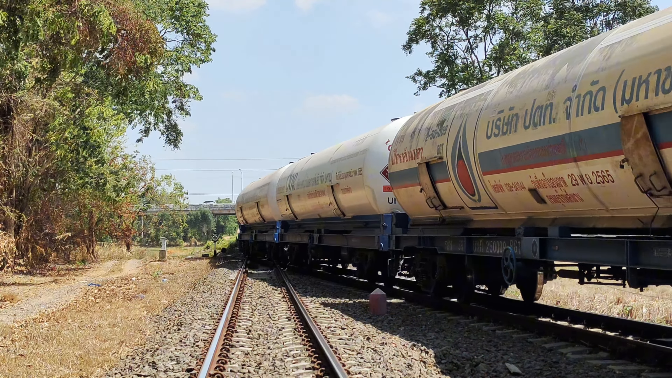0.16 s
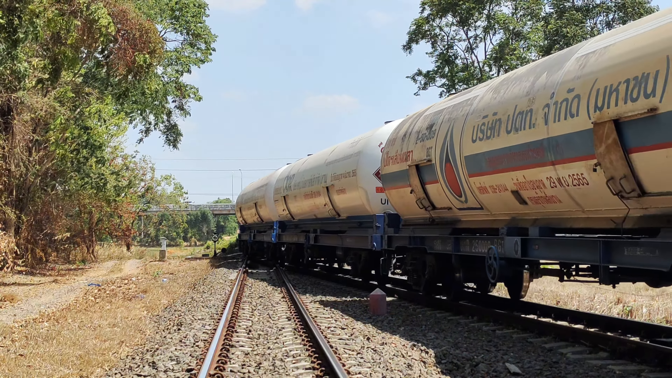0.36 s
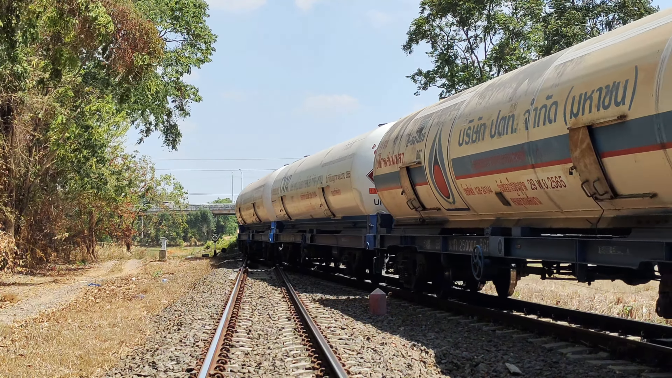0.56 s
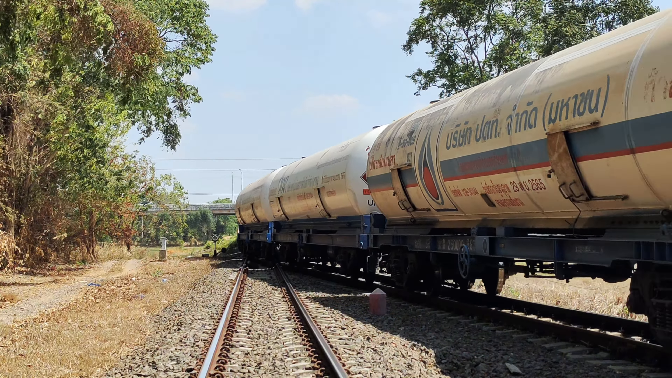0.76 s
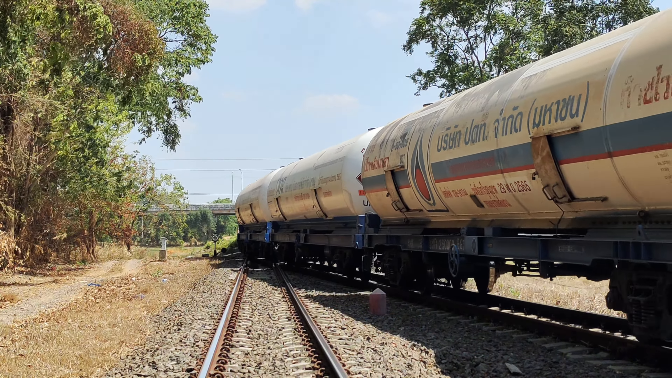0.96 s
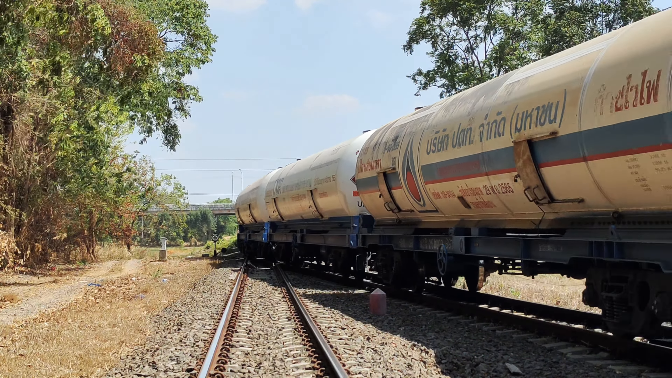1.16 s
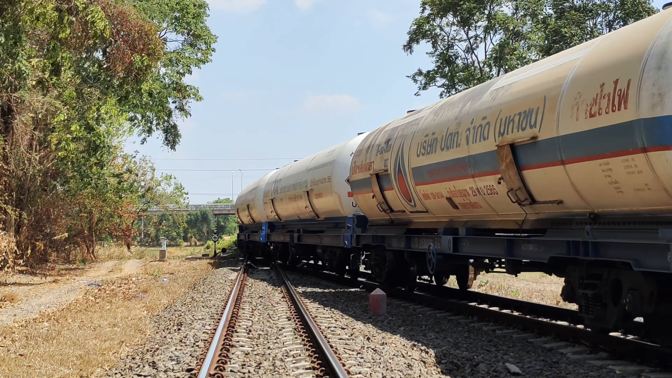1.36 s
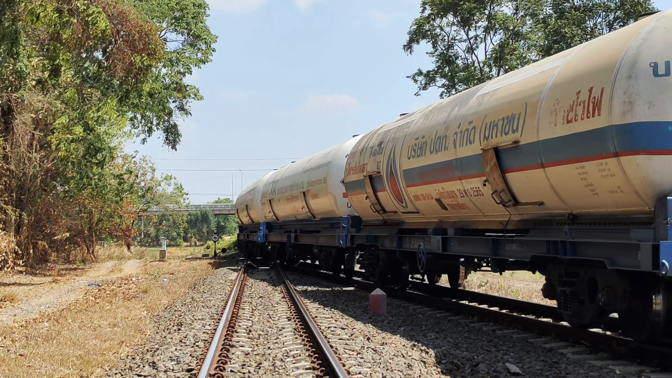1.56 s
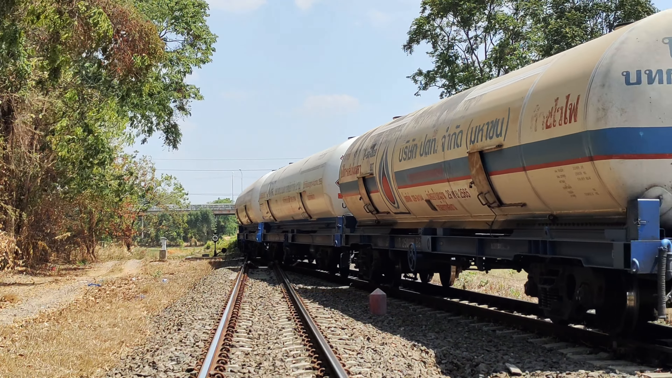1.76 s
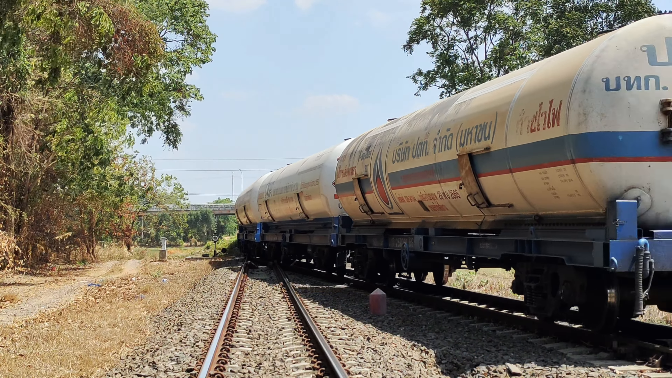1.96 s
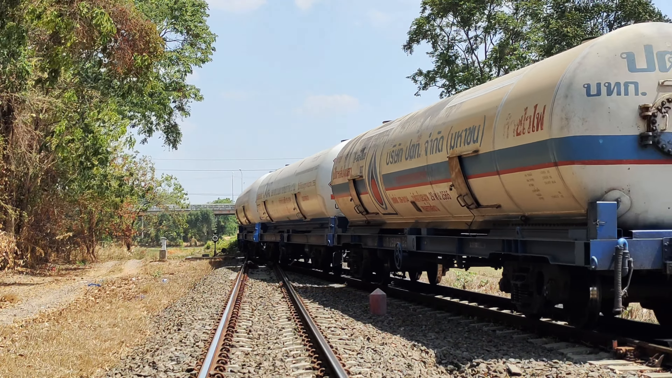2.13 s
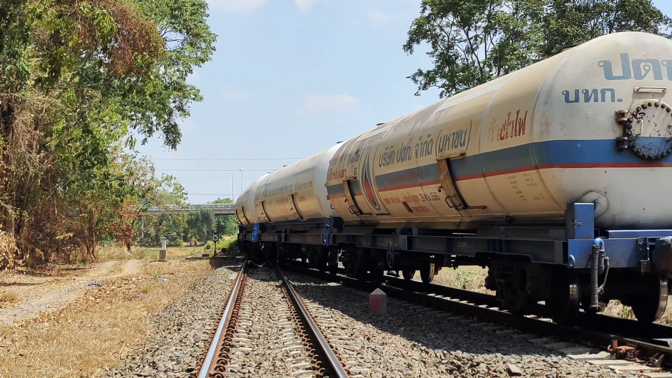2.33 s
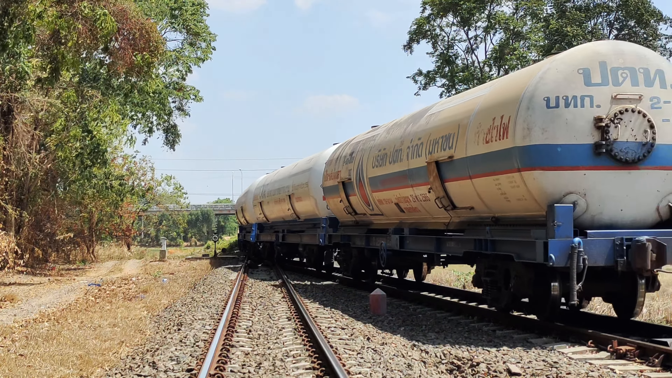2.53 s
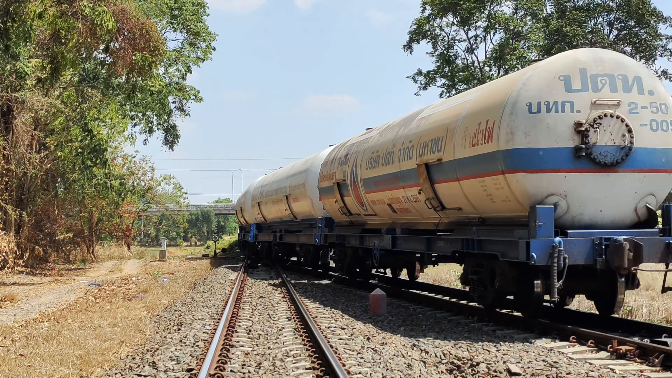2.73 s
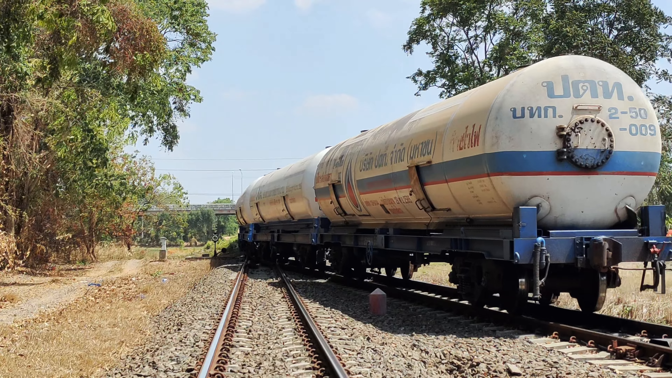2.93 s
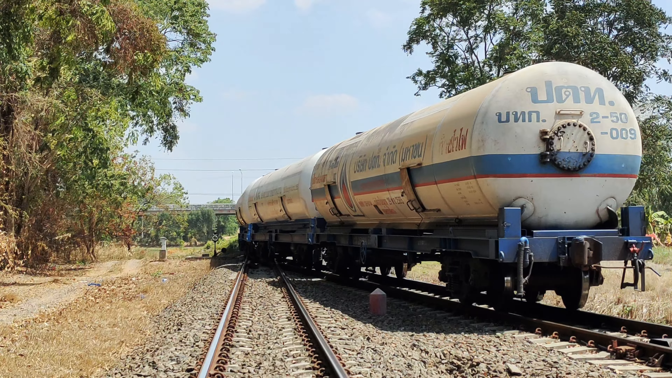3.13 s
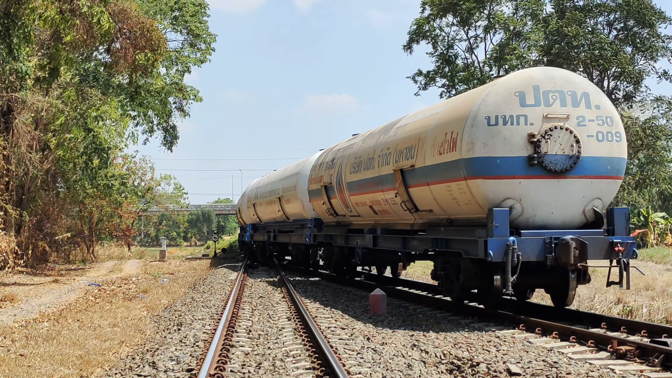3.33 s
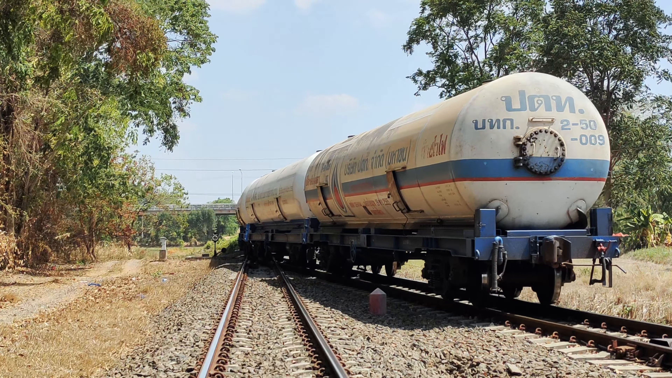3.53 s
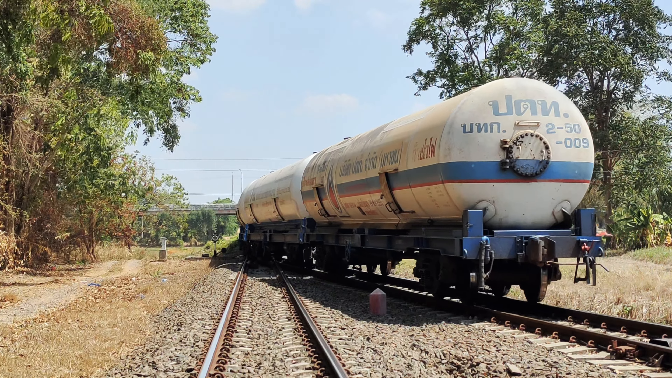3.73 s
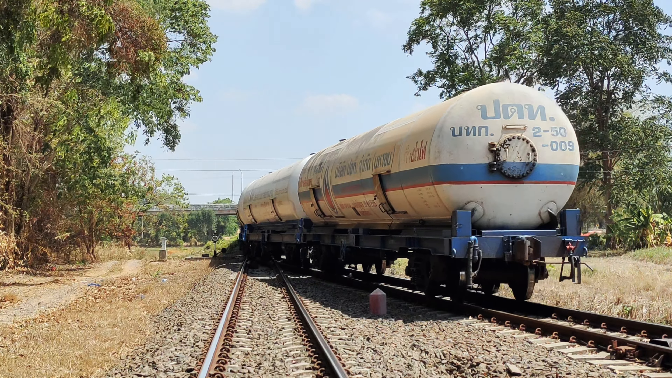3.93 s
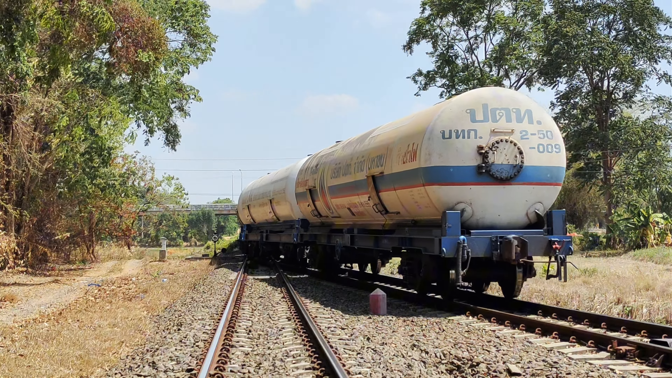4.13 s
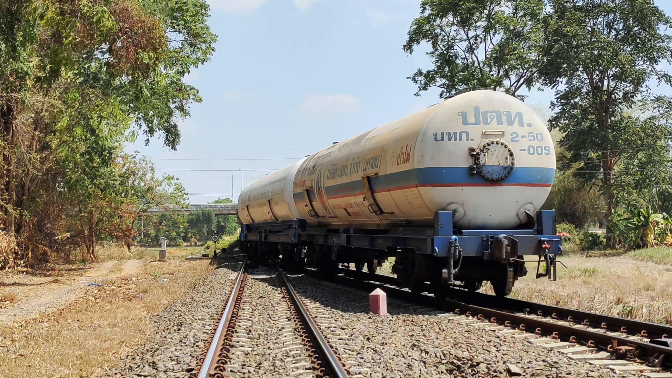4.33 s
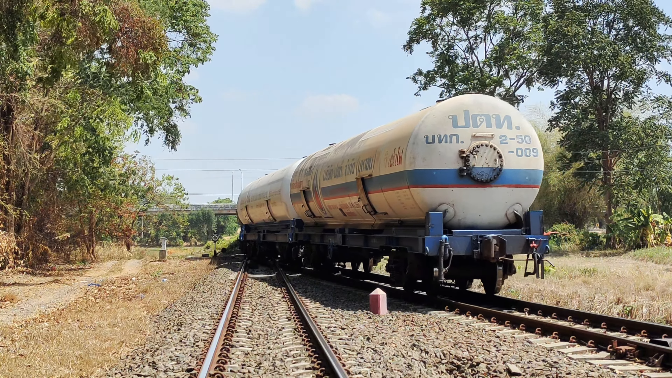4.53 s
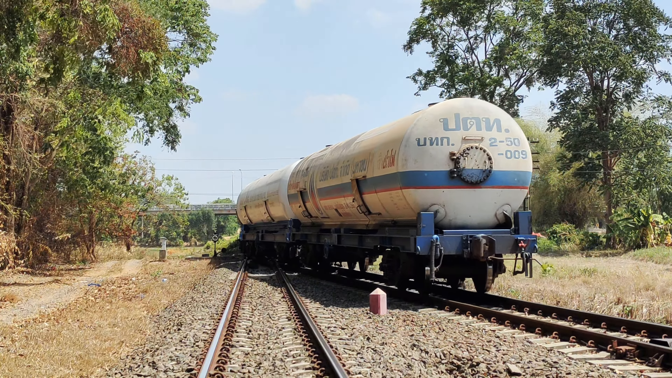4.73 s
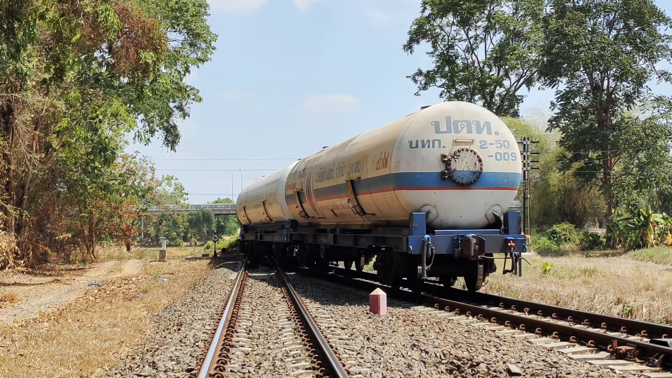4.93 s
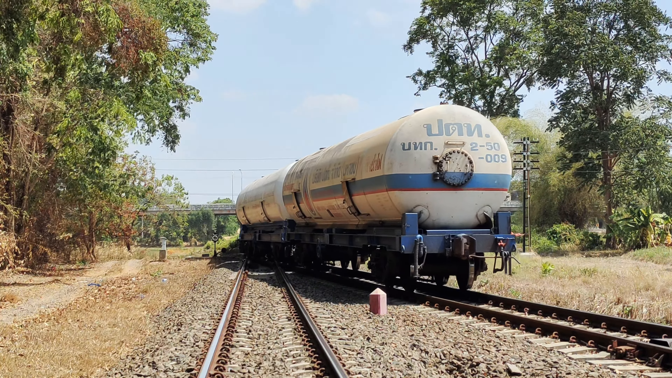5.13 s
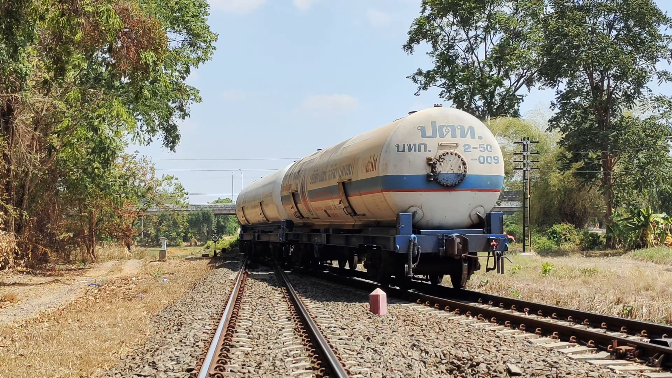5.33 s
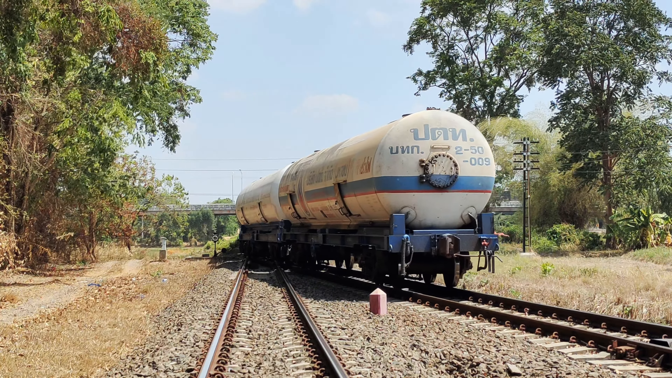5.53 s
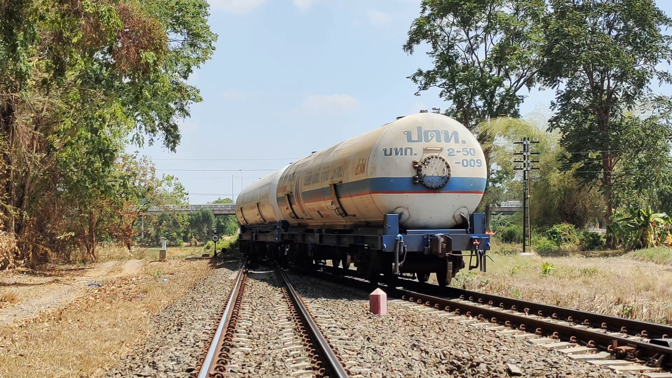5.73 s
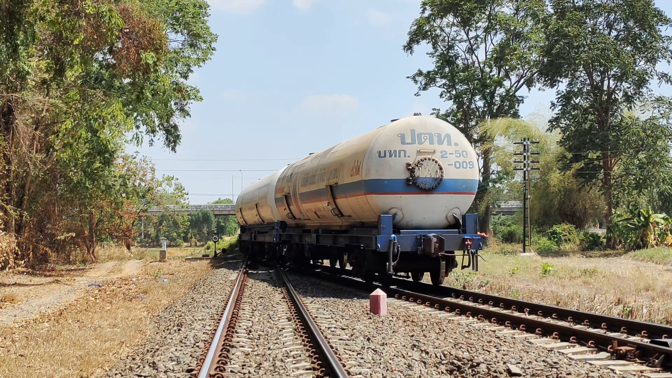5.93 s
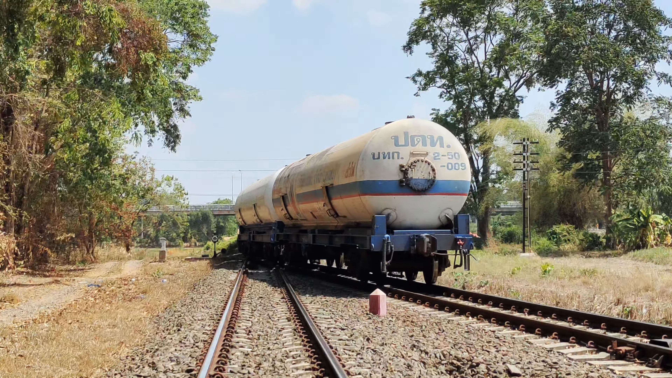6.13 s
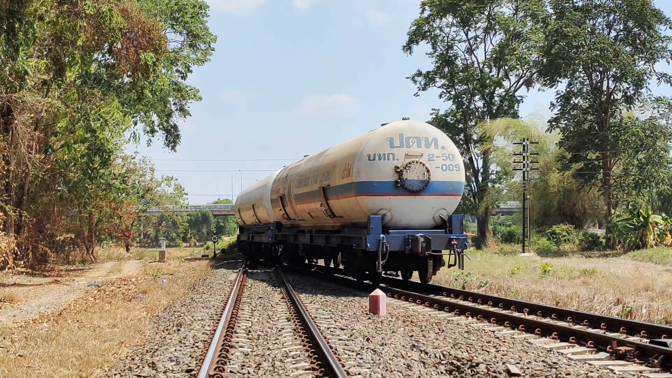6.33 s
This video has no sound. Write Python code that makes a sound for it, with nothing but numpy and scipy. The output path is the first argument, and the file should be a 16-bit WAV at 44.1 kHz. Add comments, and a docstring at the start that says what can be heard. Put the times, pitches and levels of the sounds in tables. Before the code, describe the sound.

Steel train wheels squeal piercingly on a curve over low rumble and grinding, with a clatter of knocks early on, then gradually thin out.

```python
"""A train of tank wagons rolls slowly away round a tight curve in an open yard lined with trees.
From the start two slipping wheels squeal near 3.2 and 3.4 kHz (wavering tones with overtones and echoes),
flanges grind and wagons rumble and boom (shaped noise), and other wheel tones sing out briefly.
Between 1.3 and 2.1 s the last bogie groans (rough tones) and knocks over a rail joint (bursts of noise).
From 1.4 s, and mostly near the end, puffs of air bump the microphone (short falling tones)."""
import sys
import numpy as np
from scipy import signal
from scipy.fft import rfft, irfft, next_fast_len
from scipy.io import wavfile
from scipy.ndimage import uniform_filter1d

SR = 44100
rng = np.random.default_rng(int(sys.argv[2]) if len(sys.argv) > 2 else 0)


def digitize_waveform(pressure):
    """Quantize a signal to 16-bit integers and store it at the path in sys.argv[1].

    Rows of a 2-D input are taken as channels; values are limited to [-1, 1].
    """
    field = np.atleast_2d(pressure).T
    bounded = np.clip(field, -1, 1)
    quanta = np.round(bounded * 32767).astype(np.int16)
    wavfile.write(sys.argv[1], SR, quanta)


N = 285768
T = np.arange(N) / SR   # time of every sample in seconds

# Spectrum tables give relative levels: the noise made from them is scaled to rms 1.
# A resonance's width is how far from its centre its amplitude has halved.

# How alike left and right are. Each row: frequency in Hz, correlation from 0 to 1.
STEREO_LIKENESS = [(30, .7), (100, .7), (170, .45), (300, .85), (550, .6), (1100, .22), (3200, .55),
                   (5000, .15), (15000, .15)]
# Tilt between the sides. Each row: frequency in Hz, left level over right in dB.
SIDE_BALANCE = [(30, -1), (120, -0.5), (300, -1), (700, -2), (2000, 0), (6000, 1), (7300, -0.5),
                (9600, 8.5), (13000, 3.5), (15000, 9)]
CUTOFF_HZ = 15400

# Deep rumble of the wagons. Each row: time in seconds, level in dB.
RUMBLE_LEVEL = [(0.0, -35.5), (1.3, -37.5), (1.75, -34), (2.7, -35), (3.5, -35.5), (5.9, -35), (6.2, -37.5),
                (6.48, -41)]
# Its spectrum. Each row: frequency in Hz, relative level in dB per Hz.
RUMBLE_SPECTRUM = [(30, -22.5), (42, -1.5), (70, -4), (100, -1), (140, -13.5), (220, -13.5), (300, -35)]
# Roar of the wheels, loudest as the last bogie goes by. Each row: time in seconds, relative level in dB.
ROAR_LEVEL = [(0.0, -33.5), (0.72, -34), (1.85, -31.5), (2.35, -32), (3.0, -34), (6.48, -38.5)]
# Its spectrum. Each row: frequency in Hz, relative level in dB per Hz.
ROAR_SPECTRUM = [(250, -4), (330, -9), (430, 1.5), (560, -1.5), (680, -11), (850, -8), (1300, -20.5),
                 (1750, -20.5), (2050, -13), (2600, -38)]
# Faint steady hiss. Each row: frequency in Hz, relative level in dB per Hz.
AIR_SPECTRUM = [(1500, -6.5), (3000, 2.5), (4500, -1), (6000, 2.5), (8000, -23), (11500, -26.5),
                (15500, -14.5)]

# Hollow booming of the tanks. Each row: time in seconds, low mode's level in dB, high mode's level in dB.
BOOM_LEVELS = [(0, -45, -45), (.55, -55, -43.5), (.85, -41, -34.5), (1.2, -37.5, -42.5),
               (3.299, -37.5, -45.5), (3.801, -31.5, -46), (4.5, -37.5, -56), (5.5, -39.5, -64),
               (6.15, -36, -38), (6.48, -45, -38.5)]
# The two modes. Each row: frequency in Hz, width in Hz, relative level in dB.
TANK_MODES = [(95.6, 22.7, 0), (177.4, 42, 0)]

# Puffs of air on the microphone.
# Each row: start in seconds, length in seconds, middle pitch in Hz, level in dB, left over right in dB.
AIR_PUFFS = [(1.395, 0.012, 128, -28, 15), (3.43, 0.03, 135, -29, 25), (5.655, 0.037, 178, -34.5, 13),
             (5.715, 0.0085, 169, -30, 12), (5.937, 0.007, 165, -24, 15), (6.075, .008, 191, -30, 5),
             (6.105, 0.01, 170, -25, -8), (6.13, 0.032, 130.4, -27, 8), (6.378, 0.012, 187, -21, 5)]
# The fall is a share of the pitch.
PUFF_FALL, PUFF_ATTACK_S, PUFF_RELEASE_S = 0.39, 0.0045, 0.0029

# Wheels and running gear at the rail joint.
# Each row: time in seconds, thud level in dB, relative clank level in dB over the thud.
JOINT_KNOCKS = [(1.688, -29, -9), (1.722, -29, -4.5), (1.767, -31, 1.5), (1.79, -27, -4),
                (1.822, -31, -1.5), (1.844, -29.5, -4), (1.881, -38, 4), (2.009, -30, -2),
                (2.043, -26, -5.5), (2.071, -37, -3)]
# Resonances of the bogie frame. Each row: frequency in Hz, width in Hz, relative level in dB.
BOGIE_MODES = [(85, 58, -1), (201, 110, 0), (423, 54, -6.5), (553, 55, 2.5), (700, 120, -12),
               (920, 210, -2)]
# Clanking loose steel. Each row: frequency in Hz, relative level in dB per Hz.
CLANK_SPECTRUM = [(500, 18), (950, -11), (1500, 6.5), (2400, 8.5), (3600, -27), (5000, 8), (6500, -10),
                  (9000, -51), (15000, -34)]
DROP_S, DROP_DB = 1.6, -29.5   # the wagon's weight comes down

# Groans of the running gear, loudest around the joint.
# Each row: start in seconds, length in seconds, middle pitch in Hz, glide in Hz, level in dB.
GEAR_GROANS = [(1.295, .11, 401.6, -1, -32), (1.425, 0.032, 448, 20, -28.5), (1.49, 0.13, 428, 28, -36),
               (1.53, 0.15, 518, 22, -37), (1.685, .11, 549.5, -23, -26.5), (1.80, 0.092, 442.3, -23, -27),
               (2.0, 0.066, 548, 14, -27.5), (2.05, 0.027, 409, 1, -30.5), (5.15, 0.45, 396, 14, -41)]
GROAN_ATTACK_S, GROAN_RELEASE_S = 0.0058, 0.019

# Flange pressing on the rail. Each row: time in seconds, grinding level in dB, relative rasp level in dB.
FLANGE_LEVELS = [(0.0, -25.5, -36.5), (0.67, -25.5, -36), (0.795, -33.5, -45), (0.825, -29.5, -37),
                 (1.5, -29.5, -38.5), (1.64, -37, -46), (1.8, -26, -43.5), (2.22, -34, -43),
                 (2.47, -37, -46), (2.62, -30.5, -43.5), (3.25, -37, -44.5), (3.95, -38, -68),
                 (5.38, -41, -63), (5.44, -29, -52), (5.55, -39, -49), (5.68, -36, -55), (5.79, -32, -37.5),
                 (6.19, -26, -40), (6.48, -33.5, -54)]
# Wheel and rail resonances in the grinding. Each row: frequency in Hz, width in Hz, relative level in dB.
GRIND_MODES = [(2016, 48, -15.5), (2334, 67, -5), (2552, 110, -4.5), (2827, 120, 1.5), (3032, 94, 1),
               (3267, 59, 9), (3404, 61, 4), (3524, 110, 4.5), (3820, 88, -1.5), (4100, 90, -8)]
# Resonances in the high rasp. Each row: frequency in Hz, width in Hz, relative level in dB.
RASP_MODES = [(5200, 200, -3.5), (5780, 130, -5), (6210, 49, 7), (6310, 45, 2.5), (6470, 65, 6.5),
              (6720, 120, 4.5), (7270, 63, -4.5)]
# Broad hiss of the sliding contact. Each row: frequency in Hz, relative level in dB per Hz.
HISS_SPECTRUM = [(1200, -45), (2000, -7.5), (3200, -5), (4500, -2.5), (5500, 8.5), (7000, 1), (8200, -27),
                 (9900, 5), (11400, -25.5), (13000, 1.5), (15500, -28.5)]

# Other tones in which the wheels sing. Each name holds: frequency in Hz, octave level in dB over the
# fundamental, share of the pitch by which each slip differs.
WHEEL_MODES = {"low": (1363, -30, .006), "whistle": (2360, -35, .008), "hoot": (2605, -35, .008),
               "keen": (2826, -30, .005), "whine": (2890, -30, .007), "moan": (3015, -25, .007),
               "squeal": (3560, -23, .008), "cry": (3590, -17, .007), "shriek": (3602, 1, .005),
               "yelp": (3730, -13, .007), "shrill": (3815, -28, .007), "ring": (3995, -27, .005),
               "thin": (4135, -30, .007), "chirp": (4335, -34, .006), "high": (4712, -28, .005),
               "pip": (6620, -42, .005), "top": (6744, -40, .0012)}
# Short squeals in those tones.
# Each row: start in seconds, length in seconds, name of the mode, glide in Hz, level in dB.
SQUEALS = [(0.0, 0.76, "squeal", 0, -32.5), (0.0, 0.48, "whistle", 0, -45.5),
           (0.0, 0.013, "pip", -200, -25.5), (0.0, .7, "shrill", 0, -42), (0.0, .3, "thin", 0, -47),
           (.18, 0.26, "keen", 8, -38.5), (0.59, 0.19, "whistle", -2, -41.5),
           (0.6, 0.12, "shriek", -22, -42), (.828, 0.021, "pip", -240, -29),
           (.88, 0.23, "shrill", -35, -42), (0.9, .22, "whistle", -15, -45),
           (0.901, 0.4, "squeal", -18, -40), (.98, 0.12, "moan", -30, -36.5),
           (1.26, 0.085, "moan", -22, -35.5), (1.39, 0.043, "whine", 11, -38.5), (2.52, .13, "top", 0, -43),
           (2.6, .74, "squeal", 0, -42), (2.937, .06, "whine", -7, -35), (3.03, .08, "top", 0, -38),
           (3.21, .08, "top", 0, -43), (3.275, .035, "whine", 12, -34), (3.545, 0.031, "chirp", -25, -40),
           (3.61, 0.05, "chirp", 0, -44), (3.72, 0.03, "chirp", 0, -46), (3.957, 0.13, "high", 10, -52),
           (4.091, 0.15, "high", 35, -40), (4.206, 0.049, "whine", -20, -41),
           (4.269, 0.07, "high", 43, -47), (4.402, 0.09, "chirp", -63, -37),
           (4.52, 0.034, "chirp", -30, -40), (4.593, 0.56, "shriek", 0, -43.5), (4.665, .62, "cry", 0, -41),
           (4.735, .15, "cry", 15, -33), (4.8, .3, "low", 0, -64), (4.95, .2, "top", 0, -53),
           (4.97, 0.31, "thin", 26, -45), (5.05, 0.31, "low", 3, -54), (5.09, .18, "cry", -11, -34),
           (5.294, 0.14, "ring", -15, -39.5), (5.336, .13, "squeal", -3, -43), (5.68, .3, "low", 0, -59),
           (5.72, .42, "hoot", 0, -46), (5.753, 0.059, "chirp", -31, -34), (5.76, 0.58, "squeal", 0, -37),
           (5.77, .15, "whistle", 0, -50), (5.78, .38, "top", 0, -46), (5.829, 0.076, "chirp", 50, -38),
           (5.86, 0.5, "yelp", 10, -39), (5.9, 0.48, "whistle", 1, -41.5), (5.97, 0.5, "low", 0, -53.5),
           (6.08, .15, "low", 0, -49.5), (6.142, .055, "yelp", -40, -25.5), (6.148, 0.06, "top", 0, -27),
           (6.42, 0.04, "high", 20, -48)]

# A flange strikes the rail and the wheel pings. Each row: start in seconds, pitch in Hz, level in dB.
PINGS = [(0.807, 3314, -17.5), (2.573, 3310, -19), (4.069, 3225, -17.5)]
PING_ATTACK_S, PING_DECAY_S = .002, .016

# A wheel bites harder for a moment and its tone stands out clear.
# Each row: start in seconds, length in seconds, middle pitch in Hz, glide in Hz, level in dB.
BITES = [(0.0, 0.02, 3245, 0, -21), (0.075, 0.027, 3250, -3, -22), (0.09, 0.36, 3397, -1, -28.5),
         (0.27, 0.041, 3392, -2, -17.5), (0.355, 0.12, 3262, -12, -21), (.47, 0.12, 3402, -7, -22),
         (0.492, 0.056, 3212, -37, -19.5), (0.63, 0.045, 3222, 18, -20), (0.836, 0.076, 3245, -42, -22.5),
         (1.07, 0.039, 3222, -13, -20.5), (1.13, .1, 3380, -6, -29), (1.18, 0.05, 3218, 1, -22.5),
         (1.25, 0.064, 3372, -11, -18.5), (1.33, 0.049, 3208, -15, -21), (1.377, 0.065, 3187, -14, -16.5),
         (1.55, 0.049, 3192, -7, -21.5), (1.663, 0.052, 3312, -17, -23), (2.66, 0.058, 3385, -7, -27),
         (2.8, .04, 3388, 2, -38), (2.955, 0.04, 3210, -7, -25), (2.97, 0.16, 3385, -4, -39),
         (3.3, .05, 3378, 0, -33), (3.455, 0.095, 3200, -23, -24), (3.505, 0.035, 3375, 7, -26.5),
         (3.59, 0.034, 3195, -12, -24), (3.778, 0.019, 3240, 3, -24.5), (4.113, 0.042, 3325, 44, -32),
         (4.408, 0.053, 3208, -15, -21), (5.22, 0.033, 3185, -10, -29.5), (5.755, 0.043, 3190, -10, -27),
         (5.797, .12, 3396, -8, -30), (5.83, 0.054, 3200, -9, -22), (5.945, 0.06, 3190, -10, -27.5),
         (6.04, 0.035, 3202, 12, -19), (6.084, 0.048, 3553, 2, -35), (6.255, 0.033, 3372, -13, -23.5)]
BITE_ATTACK_S, BITE_RELEASE_S = 0.0074, 0.02

# Steady slip of the loudest wheel. Each row: time in seconds, pitch in Hz, level in dB.
FIRST_WHEEL = [(0.0, 3254, -31), (0.32, 3280, -41), (0.66, 3223, -25), (0.795, 3245, -42),
               (0.84, 3265, -25), (1.02, 3285, -36.5), (1.52, 3192, -24), (1.66, 3258, -32.5),
               (1.8, 3190, -21), (2.47, 3187, -19), (2.54, 3240, -28.5), (3.0, 3215, -25),
               (3.42, 3241, -31.5), (3.6, 3200, -28.5), (4.01, 3240, -51), (4.1, 3205, -32),
               (4.58, 3218, -34), (4.98, 3237, -57), (5.25, 3182, -37), (5.6, 3205, -32), (5.95, 3205, -28),
               (6.48, 3225, -35)]
# A second wheel, about a semitone higher. Each row: time in seconds, pitch in Hz, relative level in dB.
SECOND_WHEEL = [(0.0, 3387, -23.5), (0.6, 3394, -23), (0.795, 3444, -38), (0.88, 3397, -25),
                (1.25, 3360, -23), (1.64, 3390, -32), (1.85, 3402, -29), (2.5, 3395, -35.5),
                (2.63, 3390, -28), (3.3, 3378, -33), (4.15, 3352, -34.5), (4.6, 3410, -69),
                (5.2, 3410, -38), (5.72, 3380, -62), (5.87, 3410, -40), (6.25, 3410, -35),
                (6.48, 3390, -35)]
# How unevenly the loudest wheel slips; it runs cleanest while it holds its note.
# Each row: time in seconds, share of the pitch by which each slip differs.
FIRST_WHEEL_JITTER = [(0.0, .007), (1.1, .007), (1.4, .005), (2.48, .005), (2.56, .01), (3.3, .01),
                      (3.5, .006), (6.0, .006), (6.3, .009)]
SECOND_WHEEL_JITTER = .005   # the same share for the second wheel
# Lowest and highest frequency in Hz between which the wheel discs ring freely.
WHEEL_BAND_HZ = (3130, 3480)
# The octave's level when the fundamental stands at the knee, and how fast it grows on each side of it.
OCTAVE_DB, OCTAVE_KNEE_DB = -35.5, -28
OCTAVE_SLOPE_BELOW, OCTAVE_SLOPE_ABOVE = 1, 0.2   # dB per dB


def from_db(db):
    """Turn decibels into a gain."""
    return 10 ** (np.asarray(db) / 20)


def rms_one(x):
    """Scale to an rms (average strength) of 1."""
    return x / np.sqrt(np.mean(x ** 2) + 1e-20)


def in_time(rows):
    """Turn each table column after the time into a curve with a value for every sample."""
    seconds, *columns = np.transpose(rows)
    return [np.interp(T, seconds, column) for column in columns]


def at_hz(points, hz):
    """Read a frequency table, with straight lines between points on a log-frequency axis."""
    table_hz, values = np.array(points).T
    return np.interp(np.log(hz + 1e-9), np.log(table_hz), values)


def drift(rate_hz, size=N):
    """Smooth random curve of spread 1, changing about rate_hz times a second."""
    pole = np.exp(-16 * np.pi * rate_hz / SR)   # one value per 8 samples
    raw = rng.standard_normal(size // 8 + 4002)
    slow = signal.lfilter([1], [1, -2 * pole, pole * pole], raw)[4000:]   # drop the filter's start-up
    return np.interp(np.arange(size) / 8, np.arange(len(slow)), rms_one(slow))


def balance(hz):
    """Gain of the left and right side at each frequency."""
    return from_db(at_hz(SIDE_BALANCE, hz) * [[.5], [-.5]])


def left_and_right(pair, hz):
    """Mix two unrelated spectra into left and right: alike in the bass, apart in the highest treble."""
    alike = np.clip(at_hz(STEREO_LIKENESS, hz), 0, 1)
    shared = np.sqrt((1 + alike) / 2) * pair[0]
    opposed = np.sqrt((1 - alike) / 2) * pair[1] * [[1], [-1]]
    return (shared + opposed) * balance(hz)


def noise(colour):
    """Stereo noise of rms 1, shaped by the gain colour(hz)."""
    size = next_fast_len(N)
    hz = np.fft.rfftfreq(size, 1 / SR)
    white = rfft(rng.standard_normal((2, size)))
    return rms_one(irfft(left_and_right(white, hz) * colour(hz), size)[:, :N])


def broad(points):
    """Noise with a smooth spectrum that falls away beyond its ends."""
    lowest_hz, highest_hz = points[0][0], points[-1][0]

    def colour(hz):
        low_end = np.minimum(hz / lowest_hz, 1) ** 2
        high_end = np.maximum(hz / highest_hz, 1) ** 2
        return from_db(at_hz(points, hz)) * low_end / high_end
    return noise(colour)


def resonant(modes):
    """Countless tiny contacts keep steep-sided resonances ringing."""
    def colour(hz):
        power = sum((from_db(db) / (1 + ((hz - f) / width) ** 2)) ** 2 for f, width, db in modes)
        return np.sqrt(power) * hz / (hz + 30)   # the deepest bass is thinned out
    return noise(colour)


def yard(x, echo_db, t60):
    """Direct sound plus scattered echoes from wagons, ballast and trees, falling 60 dB in t60 seconds."""
    t = T[:SR // 2]
    strength = rng.standard_normal((2, len(t)))
    present = rng.random((2, len(t))) < .03   # about 3 samples in 100 hold an echo
    echoes = strength * present * from_db(-60 * t / t60)
    echoes *= from_db(echo_db) / np.sqrt(np.sum(echoes ** 2, axis=1, keepdims=True))
    size = next_fast_len(len(x) + len(t))
    hz = np.fft.rfftfreq(size, 1 / SR)
    path = balance(hz) + left_and_right(rfft(echoes, size), hz)
    heard = irfft(rfft(x, size) * path, size)[:, :len(x)]
    return heard / np.sqrt(1 + from_db(echo_db) ** 2)


def steady(x, span_s):
    """Hold the short-term power near 1, evening out the random fading of echoes and noise."""
    power = uniform_filter1d(np.mean(x ** 2, axis=0), int(span_s * SR))
    return x / np.sqrt(power + 1e-6)


def slip_phase(hz, wander, jitter, size=N):
    """Phase of a self-excited tone: its pitch wanders with the load and jitters with each slip."""
    slow = wander * drift(14.43, size=size)
    quick = jitter * drift(179.7, size=size)
    return 2 * np.pi * np.cumsum(hz * (1 + slow + quick)) / SR


def glide(t, length, hz, glide_hz):
    """Pitch sliding evenly by glide_hz in all, passing hz halfway."""
    return hz + glide_hz * (np.minimum(t / length, 1) - .5)


def swell(t, length, attack_s, release_s):
    """Loudness that rises, holds, then dies away after length seconds."""
    rise = 1 - np.exp(-t / attack_s)
    return rise * np.exp(-np.maximum(t - length, 0) / release_s)


def span(start, length):
    """Samples that an event covers, and the time since its start."""
    at = max(int(start * SR), 0)
    t = T[:min(N - at, int(length * SR))]
    return slice(at, at + len(t)), t


def blows(times, levels_db, t60, rise_s):
    """Loudness curve of blows whose energies add up and die away."""
    hits = np.zeros(N)
    hits[(np.asarray(times) * SR).astype(int)] = from_db(levels_db) ** 2
    decay = from_db(-120 / (t60 * SR))   # this is energy, so 60 dB is a factor of a million
    rise = np.exp(-1 / (rise_s * SR))
    energy = signal.lfilter([1 - rise], np.convolve([1, -decay], [1, -rise]), hits + 1e-18)
    return np.sqrt(energy)


def strands(modes, flare_db):
    """Each scraped resonance flares and fades on its own."""
    return rms_one(sum(from_db(db + flare_db * drift(6.5)) * resonant([(hz, width, 0)])
                       for hz, width, db in modes))


def octave_level(level_db):
    """The octave grows with the fundamental, then hardly any more once above the knee."""
    over_db = level_db - OCTAVE_KNEE_DB
    below = OCTAVE_SLOPE_BELOW * np.minimum(over_db, 0)
    above = OCTAVE_SLOPE_ABOVE * np.maximum(over_db, 0)
    return OCTAVE_DB + below + above


def rolling():
    """Rough treads shake the wagons and the track, over a faint steady hiss."""
    rumble_db, = in_time(RUMBLE_LEVEL)
    roar_db, = in_time(ROAR_LEVEL)
    rumble = from_db(rumble_db + 1.2 * drift(11)) * broad(RUMBLE_SPECTRUM)
    roar = from_db(roar_db - 1.0 + 1.08 * drift(12.6)) * broad(ROAR_SPECTRUM)
    return rumble + roar + from_db(-43.5) * broad(AIR_SPECTRUM)


def wagon_bodies():
    """The hollow tanks boom at two low resonances as they roll."""
    return sum(from_db(db) * steady(resonant([mode]), span_s=0.38)
               for db, mode in zip(in_time(BOOM_LEVELS), TANK_MODES))


def air_puffs():
    """Puffs of air give short, deep bumps, often mostly on one side; pitch falls as the eddy passes."""
    out = np.zeros((2, N))
    for start, length, hz, db, pan_db in AIR_PUFFS:
        where, t = span(start, length + .06)
        pitch = glide(t, length, hz, -PUFF_FALL * hz)
        phase = slip_phase(pitch, wander=.03, jitter=.18, size=len(t))
        side_gain = from_db(db + pan_db * np.array([[.5], [-.5]]))
        bump = swell(t, length, PUFF_ATTACK_S, PUFF_RELEASE_S) * np.sqrt(2) * np.sin(phase)
        out[:, where] += side_gain * bump
    return out


def rail_joint():
    """Each blow rings the bogie frame and sets loose steel clanking, with a short crack at its start."""
    s, db, clank_db = np.transpose(JOINT_KNOCKS)
    frame = blows(s, db, t60=0.65, rise_s=0.0027) * resonant(BOGIE_MODES)
    clank = blows(s, db + clank_db + 0.5, t60=0.48, rise_s=0.0011)
    crack = blows(s, db + clank_db - 12, t60=0.026, rise_s=.0003)
    drop = blows([DROP_S], [DROP_DB], t60=1.0, rise_s=0.0073) * broad(RUMBLE_SPECTRUM)
    return frame + (clank + crack) * broad(CLANK_SPECTRUM) + drop


def groans():
    """Loaded running gear judders in short, rough, gliding groans."""
    out = np.zeros((2, N))
    for start, length, hz, glide_hz, db in GEAR_GROANS:
        where, t = span(start, length + .2)
        phase = slip_phase(glide(t, length, hz, glide_hz), wander=.018, jitter=.07, size=len(t))
        tone = steady(yard(np.sin(phase), echo_db=-3.5, t60=0.19), span_s=0.062)
        out[:, where] += from_db(db) * swell(t, length, GROAN_ATTACK_S, GROAN_RELEASE_S) * tone
    return out


def flanges(chatter_db=1.5):
    """Flanges scrape the rail head; each resonance flares on its own, under a shared uneven chatter."""
    grind_db, rasp_db = in_time(FLANGE_LEVELS)
    grind = from_db(grind_db) * strands(GRIND_MODES, flare_db=2.5)
    rasp = from_db(rasp_db + 4.5) * strands(RASP_MODES, flare_db=2.5)
    hiss = from_db(.5 * (grind_db + rasp_db) - 8.0) * broad(HISS_SPECTRUM)
    return (grind + rasp + hiss) * from_db(chatter_db * drift(26))


def short_squeals(ring_s=0.045, third_db=-19, flutter_db=2.17):
    """A mode swells while its wheel slips, faster in a short squeal, and rings out when it grips again."""
    out = np.zeros((2, N))
    for start, length, mode, glide_hz, db in SQUEALS:
        hz, octave_db, jitter = WHEEL_MODES[mode]
        where, t = span(start, length + .35)
        pitch = glide(t, length, hz, glide_hz)
        phase = slip_phase(pitch, wander=.25 * jitter, jitter=jitter, size=len(t))
        overtones = np.sin(2 * phase) + from_db(third_db) * np.sin(3 * phase)
        voice = np.sin(phase) + from_db(octave_db) * overtones
        tone = steady(yard(voice, echo_db=4.0, t60=0.26), span_s=0.043)
        level = from_db(db + flutter_db * drift(18, size=len(t)))
        out[:, where] += swell(t, length, 0.0022 + 0.023 * length, ring_s) * level * tone
    return out


def pings():
    """A struck wheel rings at once and is quickly damped by the rail."""
    out = np.zeros((2, N))
    for start, hz, db in PINGS:
        where, t = span(start, .15)
        phase = slip_phase(hz, wander=.002, jitter=.006, size=len(t))
        tone = from_db(db) * np.sin(phase) + from_db(octave_level(db)) * np.sin(2 * phase)
        out[:, where] += np.sqrt(2) * swell(t, 0, PING_ATTACK_S, PING_DECAY_S) * tone
    return out


def bites(third_db=-20):
    """A biting wheel locks on to one clear, gliding tone with its overtones."""
    out = np.zeros((2, N))
    for start, length, hz, glide_hz, db in BITES:
        where, t = span(start, length + .15)
        phase = slip_phase(glide(t, length, hz, glide_hz), wander=.0012, jitter=.0045, size=len(t))
        tone = steady(yard(np.sin(phase), echo_db=-2.0, t60=0.2), span_s=0.04)
        overtones = np.sin(2 * phase) + from_db(third_db) * np.sin(3 * phase)
        overtones = yard(overtones, echo_db=6.0, t60=0.2)
        voice = from_db(db) * tone + from_db(octave_level(db)) * overtones
        out[:, where] += swell(t, length, BITE_ATTACK_S, BITE_RELEASE_S) * voice
    return out


def wheel(hz, level_db, octave_db, jitter, third_db, fourth_db, echo_db):
    """A squealing mode beats against its own echoes; its overtones share one phase and grip."""
    phase = slip_phase(hz, wander=.0034, jitter=jitter)
    grip = from_db(2.5 * drift(50))
    disc_filter = signal.butter(2, WHEEL_BAND_HZ, "band", fs=SR, output="sos")
    disc = signal.sosfilt(disc_filter, grip * np.sin(phase))
    third = from_db(third_db) * np.sin(3 * phase)
    fourth = from_db(fourth_db) * np.sin(4 * phase)
    overtones = np.sin(2 * phase) + third + fourth
    low = steady(yard(disc, echo_db, t60=0.15), span_s=0.13)
    high = steady(yard(grip * overtones, echo_db + 15, t60=0.53), span_s=0.091)
    flutter_db = 1.3 * drift(35) - .2   # the contact patch grips and lets go
    return from_db(level_db + flutter_db) * low + from_db(octave_db) * high


def squealing_wheels():
    """Two wheels slip sideways all along the curve, each singing its own wavering note."""
    hz, level_db = in_time(FIRST_WHEEL)
    jitter, = in_time(FIRST_WHEEL_JITTER)
    first = wheel(hz, level_db, octave_level(level_db), jitter,
                  third_db=-22.5, fourth_db=-33.0, echo_db=11.0)
    hz, level_db = in_time(SECOND_WHEEL)
    second = wheel(hz, level_db - .8, octave_level(level_db) - 8.0, SECOND_WHEEL_JITTER,
                   third_db=-22.5, fourth_db=-40.5, echo_db=7.0)
    return first + second


def scene():
    """Rolling and knocks below, grinding and squeal above."""
    below = rolling() + wagon_bodies() + air_puffs() + rail_joint() + groans()
    above = flanges() + short_squeals() + pings() + bites() + squealing_wheels()
    return below + above


def record(dry):
    """The treble is cut steeply above the cutoff."""
    steep_cut = signal.ellip(12, .1, 90, CUTOFF_HZ, fs=SR, output="sos")
    return signal.sosfilt(steep_cut, dry)


dry = scene()
out = record(dry)
digitize_waveform(out)
```